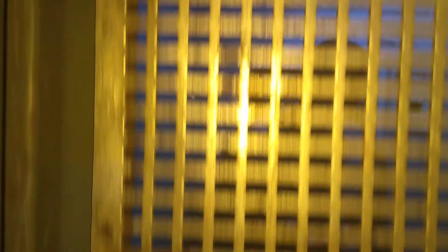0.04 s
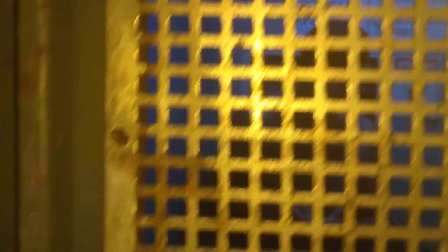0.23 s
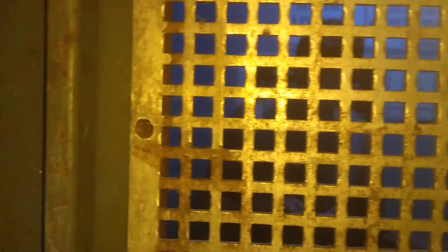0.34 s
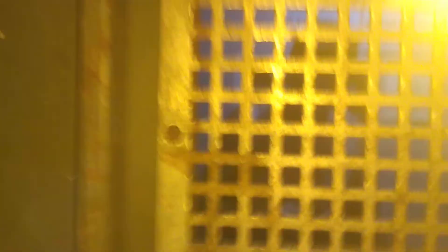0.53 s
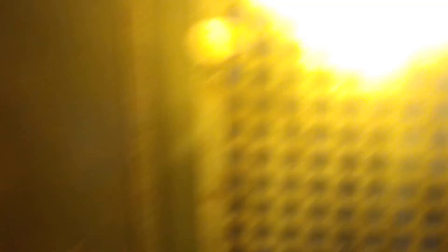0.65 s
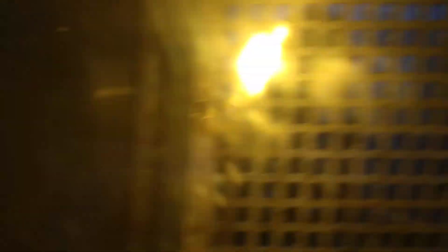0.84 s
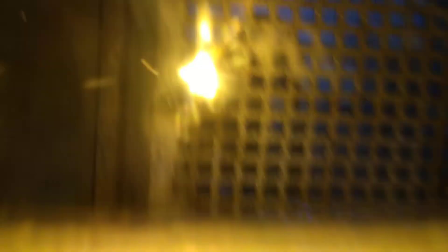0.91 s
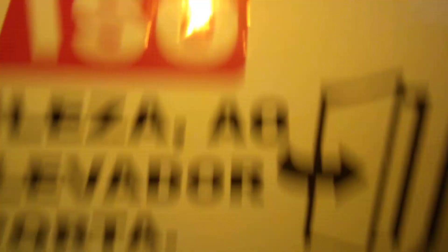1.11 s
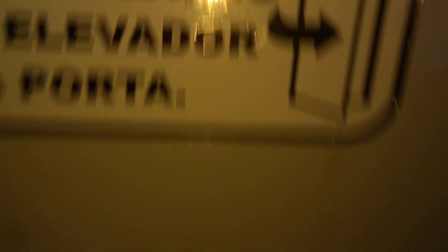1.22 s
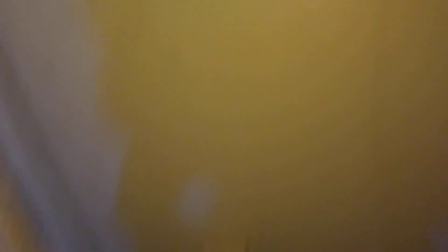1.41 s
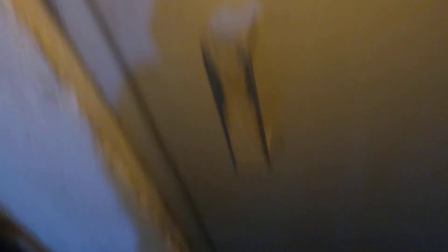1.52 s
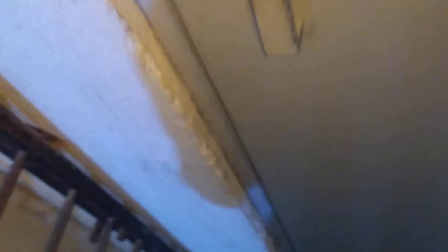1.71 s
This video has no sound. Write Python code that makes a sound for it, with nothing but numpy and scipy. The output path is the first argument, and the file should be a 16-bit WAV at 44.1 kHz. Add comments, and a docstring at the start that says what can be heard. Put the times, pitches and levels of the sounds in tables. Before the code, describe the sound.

Close by inside a lift, a metal door sticks and slips with a groan and a scrape. Two ringing clacks lead to one loud knock, then come a fading hollow hum, a few ticks and soft bumps with rustling.

```python
"""A metal lift door groans, scrapes and clacks twice as it moves, then knocks hard against its stop.
It rolls on with a hollow hum and a few light ticks; soft bumps and rustles follow close by.
The groan is the door sticking and slipping in its guide; the clacks are metal hitting metal.
Two microphone ports (openings) of opposite polarity hear it, and the hardest knock overloads them."""
import sys
import numpy as np
from scipy import signal
from scipy.fft import rfft, irfft
from scipy.io import wavfile
from scipy.ndimage import uniform_filter1d

SR = 44100
rng = np.random.default_rng(int(sys.argv[2]) if len(sys.argv) > 2 else 0)


def store_wav(level_fs):
    """Save 16-bit WAV to argv[1]."""
    pcm = np.round(np.clip(np.atleast_2d(level_fs), -1, 1) * 32767)
    wavfile.write(sys.argv[1], SR, pcm.T.astype(np.int16))


N = 77175
TIME = np.arange(N) / SR
FROM_LEFT, FROM_RIGHT = 1, -1
ATTACK_S = 0.001485  # rise time of clacks and ticks

# How much louder the left is than the right, for three places: f/Hz, level/dB
DOOR_SIDE = [(100, 4.5), (500, -4.5), (1200, 1), (2500, -4), (4500, -7), (8000, -11), (11000, -17.5),
             (15000, -7.5)]
CENTRED = [(100, 4), (500, 1.8), (2000, 0.85), (15000, 0.019)]
CLOSE_SIDE = [(100, 2.5), (500, 3), (2000, 0), (15000, 4.5)]


def amp(db):
    """Turns decibels into a gain."""
    return 10 ** (np.asarray(db) / 20)


def evened(x):
    """Scales a signal to an average power of 1."""
    return x / np.sqrt(np.mean(x ** 2) + 1e-20)


def read(points, hz):
    """Reads between a table's rows along a log-frequency axis."""
    f, value = np.transpose(points)
    return np.interp(np.log(hz + 1), np.log(f + 1), value)


def level(points):
    """Gain over time from a loudness curve."""
    return amp(np.interp(TIME, *np.transpose(points)))


def add(mix, s, sound):
    """Mixes a two-channel sound in at s seconds."""
    part = mix[:, round(s * SR):][:, :sound.shape[1]]
    part += sound[:, :part.shape[1]]


def noise(colour):
    """Two unrelated noises of one colour (the balance of low and high frequencies)."""
    hz = np.fft.rfftfreq(N, 1 / SR)
    return evened(irfft(rfft(rng.standard_normal((2, N))) * amp(read(colour, hz)), N))


def wander(shape, span_s):
    """Random drift: noise smoothed over span_s."""
    return evened(uniform_filter1d(rng.standard_normal(shape), int(span_s * SR)))


def steadied(x, span_s):
    """Evens out a noise's chance swells that are slower than span_s."""
    return x / np.sqrt(abs(uniform_filter1d(x ** 2, int(span_s * SR), axis=-1)) + 1e-12)


def burst(colour, t60, attack_s):
    """A burst of noise that fades by 60 dB in t60 seconds."""
    return noise(colour) * np.minimum(TIME / attack_s, 1) * amp(-60 * TIME / t60)


def swell(peak_s, sharpness):
    """A smooth rise to 1 at peak_s, then a fall."""
    return (TIME / peak_s * np.exp(1 - TIME / peak_s)) ** sharpness


def singing(modes, span_s):
    """Resonances that keep sounding, each a narrow band of noise."""
    hz, out = np.fft.rfftfreq(N, 1 / SR), np.zeros((2, N))
    for f, width, db in modes:
        tone = irfft(rfft(rng.standard_normal((2, N))) / (1 + ((hz - f) / width) ** 4), N)
        out += amp(db) * steadied(tone, span_s)
    return evened(out)


def ports(pair, side, balance, diffuse):
    """The right port hears sound inverted and shifted in time; a diffuse share comes from the far side."""
    delay_s, padded = 0.0004434, N + 4096
    hz = np.fft.rfftfreq(padded, 1 / SR)
    direct, scattered = rfft(pair, padded) * np.sqrt([[1 - diffuse], [diffuse]])
    shift = np.exp(-2j * np.pi * hz * delay_s * side)
    tilt = amp(read(balance, hz))
    left = (direct + scattered) * tilt
    right = -(direct * shift + scattered / shift)
    return irfft(np.array([left, right]) * np.sqrt(2 / (1 + tilt ** 2)), padded)[:, :N]


def corridor():
    """Faint hum of the building, and each microphone's own hiss."""
    # Colours of the hum and the hiss: f/Hz, level/dB
    hum_colour = [(20, -22.5), (60, 1), (130, 7.5), (330, -8), (530, 5.5), (900, -14), (2000, -17.5),
                  (5500, -21.5), (10000, -34), (15000, -34), (16500, -45.5)]
    hiss_colour = [(100, -6.5), (3000, -6.5), (7000, 1), (10000, -5.5), (15000, -11), (16500, -25.5)]
    # Loudness of the hum: t/s, level/dB
    hum_curve = [(0, -61), (1.05, -60.5), (1.17, -67.5), (1.205, -96), (1.24, -67), (1.75, -68)]
    hum = ports(noise(hum_colour) * level(hum_curve), FROM_LEFT, CLOSE_SIDE, diffuse=0.4)
    return hum + amp(-76) * noise(hiss_colour)


def handling():
    """A rustle and the panel's low, ringing shudder around the last bumps."""
    # Colours of the rustle and the panel: f/Hz, level/dB
    rustle_colour = [(30, -4), (90, 8), (200, 21.5), (400, 2), (900, -14), (1500, 0.5), (3000, -1),
                     (5600, -2.5), (8000, -9.5), (12000, -16.5), (16000, -26)]
    panel_colour = [(30, -24), (75, 1), (140, 6), (240, -3.5), (350, -20), (520, -12.5), (800, -32.5),
                    (3000, -44.5)]
    # Loudness of each: t/s, level/dB
    rustle_curve = [(1.2, -98), (1.24, -85), (1.28, -72), (1.355, -65), (1.375, -49.5), (1.405, -46.5),
                    (1.44, -61), (1.52, -64.5), (1.578, -52), (1.594, -42.5), (1.615, -54.5), (1.65, -54.5),
                    (1.68, -66), (1.75, -62)]
    panel_curve = [(1.2, -101.5), (1.26, -72.5), (1.38, -71), (1.42, -56.5), (1.48, -48), (1.52, -63),
                   (1.58, -53.5), (1.61, -43), (1.66, -54.5), (1.75, -55)]
    # Notes of the bumped panel: f/Hz, width/Hz, level/dB
    panel_notes = [(81.9, 8, -1), (140, 10, 6.5), (164, 8.4, 0), (250, 18, -6), (270, 14, -8),
                   (556, 16, -13)]
    shudder = amp(-5) * steadied(noise(panel_colour), span_s=0.05)
    shudder += amp(-0.5) * singing(panel_notes, span_s=0.069)
    rustle = noise(rustle_colour) * level(rustle_curve)
    return ports(rustle + shudder * level(panel_curve), FROM_LEFT, CLOSE_SIDE, diffuse=0.25)


def drone():
    """The door panel drones low just before it reaches the stop."""
    # Notes of the panel: f/Hz, width/Hz, level/dB
    notes = [(140, 10, 0), (212, 16, -2.5), (232, 10, -1.5)]
    # Loudness of the drone: t/s, level/dB
    curve = [(.33, -60.5), (.41, -34.5), (.47, -27), (.53, -31), (.68, -70.5)]
    return ports(singing(notes, span_s=0.059) * level(curve), FROM_RIGHT, CENTRED, diffuse=0.54)


def rolling():
    """The heavy door rumbles as it moves, then runs on with a hollow hum."""
    # Colours of the rumble and the hum: f/Hz, level/dB
    rumble_colour = [(25, -35), (50, -9.5), (100, 0.5), (220, -4.5), (330, -5), (620, -23), (850, -23.5),
                     (1100, -30), (2000, -28.5), (5000, -62)]
    hum_colour = [(40, -36), (110, -6), (230, -4.5), (350, 1), (560, -5), (800, -11), (950, -20),
                  (1150, -10.5), (1350, -23), (2000, -28.5), (4000, -47), (9000, -50.5)]
    # The door's notes in each: f/Hz, width/Hz, level/dB
    rumble_notes = [(101, 14, 0), (134, 30, 1), (184, 4.8, -10), (250.7, 19, 3), (387, 13, -0.5),
                    (483, 6.3, -10), (572, 42, -3.5), (669, 23, -3.5), (787, 25, -6), (900, 23, -24)]
    hum_notes = [(271, 10, -0.5), (338, 13, 1), (391, 11, 0), (502.7, 85, -0.5), (460.4, 13, 1.5),
                 (598, 36, -2.5), (780, 10, -13.5), (1150, 12, -10), (1172, 7.6, -11.5)]
    # Loudness of each: t/s, level/dB
    rumble_curve = [(0, -46.5), (.11, -74), (.17, -46.5), (.228, -43.5), (.248, -30), (.3, -26),
                    (.34, -30.5), (.42, -27.5), (.48, -33.5), (.53, -35), (.59, -25.5), (.655, -36),
                    (.7, -44.5), (.85, -57.5), (1.1, -91.5)]
    hum_curve = [(.54, -63), (.59, -38), (.66, -43), (.72, -40.5), (.8, -42), (.855, -48), (.895, -42.5),
                 (.945, -44), (1, -53), (1.05, -55.5), (1.08, -68), (1.15, -79)]
    rumble = amp(-1) * steadied(noise(rumble_colour), span_s=0.032)
    rumble += amp(-5.5) * singing(rumble_notes, span_s=0.3)
    hum = amp(-1.5) * steadied(noise(hum_colour), span_s=0.013)
    hum += amp(-3) * singing(hum_notes, span_s=1.0)
    return (ports(rumble * level(rumble_curve), FROM_RIGHT, CENTRED, diffuse=0.058)
            + ports(hum * level(hum_curve), FROM_RIGHT, CENTRED, diffuse=0.88))


def scrape():
    """Metal rubs on the track with a fine, grainy hiss."""
    # Colour of the rubbing: f/Hz, level/dB
    colour = [(200, -16.5), (900, -19.5), (1500, 8), (2300, 4), (3400, 1.5), (5300, 5), (7000, -3),
              (9500, -13.5), (13000, -36), (16000, -32.5)]
    # Its loudness: t/s, level/dB
    curve = [(0, -77), (.085, -70.5), (.127, -60.5), (.134, -56), (.161, -54), (.169, -41.5), (.19, -40),
             (.228, -43.5), (.26, -61), (.34, -57), (.55, -55), (.65, -64.5), (.75, -78)]
    grain = amp(2.2 * wander(N, span_s=0.00205))
    return ports(evened(noise(colour) * grain) * level(curve), FROM_RIGHT, DOOR_SIDE, diffuse=0.058)


def groan():
    """The door sticks and slips in its guide: clear, wavering notes over a rough groan."""
    # Notes of the rough groan: f/Hz, width/Hz, level/dB
    notes = [(318, 20, -2.5), (474, 50, -6), (615, 14, -3.5), (653, 21, -11.5), (1284, 30, -21)]
    # Its loudness: t/s, level/dB
    curve = [(0, -60), (.04, -52), (.055, -49), (.12, -54.5), (.14, -49.5), (.19, -42), (.24, -38.5),
             (.3, -43.5), (.45, -45.5), (.52, -49), (.56, -29.5), (.62, -56), (.8, -61.5), (1.08, -87)]
    # Slips, one note each: t/s, level/dB, f/Hz, rise time/s
    slips = [(0, -35.5, 350, 0.0064), (0.037, -34, 350, 0.013), (.042, -35, 584, 0.012),
             (0.041, -67, 1240, .045), (.076, -43.5, 626, 0.013), (.127, -36, 576, 0.012),
             (0.124, -43, 283, 0.18), (.172, -32, 570, 0.011), (.224, -27.5, 586, 0.0081),
             (.232, -38.5, 880, 0.035), (.3, -34.5, 570, 0.048), (0.431, -29, 199, .04),
             (.53, -30, 589.4, 0.04), (0.879, -40.5, 347.7, 0.022), (.885, -44, 476.5, 0.017),
             (0.929, -41.5, 250.5, .022), (.97, -49, 515, 0.037)]
    out = singing(notes, span_s=0.015) * level(curve)
    for s, db, hz, peak_s in slips:
        waver = 0.095 * wander((2, N), span_s=0.012)
        note = amp(db) * swell(peak_s, sharpness=2) * np.sin(2 * np.pi * hz * TIME + waver)
        add(out, s, note * [[1], [0]])  # direct sound only
    return ports(out, FROM_RIGHT, CENTRED, diffuse=0.033)


def ticks():
    """Small latch parts settle, each with a brief, rough ring."""
    # Latch ticks: t/s, level/dB, fade time/s, f/Hz
    hits = [(.691, -44, 0.084, 4300), (0.697, -49.5, 0.124, 4420), (0.7005, -51.5, 0.012, 11700),
            (0.799, -57.5, 0.052, 5920), (0.877, -62, 0.016, 3640), (0.9799, -55, 0.013, 3340)]
    # Colour of a tick: f/Hz, level/dB
    colour = [(300, 3), (1500, 5), (4000, 2.5), (6500, -6), (10000, -11.5), (16000, -28)]
    out, width_hz = np.zeros((2, N)), 400
    for s, db, t60, hz in hits:
        ring = amp(-1 - 60 * TIME / t60) * singing([(hz, width_hz, 0)], span_s=0.011)
        add(out, s, amp(db) * (burst(colour, t60, ATTACK_S) + ring))
    return ports(out, FROM_RIGHT, CENTRED, diffuse=0.058)


def bars():
    """The door's bars ring, fluttering as they rattle."""
    # Notes of the bars: f/Hz, level/dB, fade time/s
    notes = [(2643, -9.5, .14), (3213, 3.5, .2), (3235, 5.5, 0.055), (3350, 6, 0.097), (3490, -7, .22),
             (3700, -6, .15), (4250, -5, .15), (5502, -6, .15), (5780, 8, .06), (6470, -6.5, 0.25),
             (7820, 6, 0.049), (8800, 0, 0.1), (10800, -5.5, .08)]
    flutter_cycles, roughness = 27, 0.5
    out = np.zeros((2, N))
    for hz, db, t60 in notes:
        flutter = wander((2, 2, N), span_s=flutter_cycles / hz)
        wobble = 1 + roughness * (flutter[0] + 1j * flutter[1])  # shakes both level and phase
        tone = np.exp(2j * np.pi * (hz * TIME + rng.random((2, 1))))
        out += amp(db - 60 * TIME / t60) * (wobble * tone).real
    return out / np.sqrt(1 + 2 * roughness ** 2)


def clacks():
    """Metal meets metal: a crack, the ringing bars, and a dense tail from the door and the shaft."""
    # Hits (the first two blend into one clack): t/s, tail/dB, crack/dB, ring/dB, top edge/Hz
    hits = [(0.232, -27.5, -30.5, -49.5, 8370), (0.2392, -36, -27, -50.5, 9950),
            (0.3534, -31, -20, -32.5, 15500)]
    # Colours of the tail and the crack: f/Hz, level/dB
    tail_colour = [(60, -12), (200, 0), (600, 10.5), (870, 0), (1050, -9), (1300, 1.5), (1700, 1.5),
                   (3200, -7), (5500, -7.5), (8000, -16), (12000, -20), (16000, -40.5)]
    crack_colour = [(200, -11.5), (1200, -6.5), (2300, -17), (2950, 9.5), (3300, 1.5), (3700, 5),
                    (4400, 10.5), (5200, -7.5), (5780, 6.5), (6400, 0.5), (7200, 0.5), (7780, -19),
                    (8400, 0), (10400, -12), (11700, -9), (14000, -24.5), (16000, -54.5)]
    # How long the tail lasts: f/Hz, fade time/s
    tail_fade = [(150, 1), (600, 0.77), (1500, 0.28), (3500, 0.57), (7000, 0.48), (14000, 0.68)]
    out = np.zeros((2, N))
    for s, tail_db, crack_db, ring_db, top_hz in hits:
        hz, t, bands = signal.stft(noise(tail_colour), SR, nperseg=256)
        fade = amp(-60 * t / read(tail_fade, hz)[:, None])
        tail = signal.istft(bands * fade, SR, nperseg=256)[1][:, :N]
        body = (amp(tail_db) * tail + amp(ring_db) * bars()) * np.minimum(TIME / ATTACK_S, 1)
        crack = amp(crack_db) * burst(crack_colour, t60=0.065, attack_s=ATTACK_S)
        add(out, s, signal.sosfilt(signal.butter(2, top_hz, fs=SR, output="sos"), body + crack))
    return ports(out, FROM_RIGHT, DOOR_SIDE, diffuse=0.15)


def knocks():
    """Close, dead blows: one push, a snap and a short after-ring, plus the panel's dull swing."""
    # Blows: t/s, push/dB, low edge/Hz, high edge/Hz, snap/dB, after-ring/dB
    blows = [(.556, -21.5, 504, 3170, -37, -29.5), (0.5726, 1, 240, 600, -7, -31.5),
             (0.5802, -14.5, 249.8, 3470, -14.5, -54), (0.5813, -11.5, 903, 4440, -19.5, -49),
             (0.5888, -18, 151.2, 1265, -55, -33), (0.5947, -13, 300, 1300, -52, -45),
             (.644, -30.5, 160, 1600, -61, -35.5), (0.652, -26, 201, 1810, -52, -60),
             (1.2246, -33, 122, 481.5, -39, -56), (1.395, -54.5, 143, 394, -63, -52.5),
             (1.5829, -22, 133.3, 1140, -26.5, -43.5)]
    # Colours of the snap and the after-ring: f/Hz, level/dB
    snap_colour = [(300, -6), (1100, -9.5), (2200, 12.5), (3300, -3.5), (4400, 7), (5800, 0.5), (8000, -2),
                   (10000, -5), (13000, -9.5), (16000, -19)]
    ring_colour = [(60, -22.5), (150, 0.5), (330, -5), (520, 8), (800, -8), (1600, -12), (3500, -21.5),
                   (8000, -41), (16000, -66)]
    # Thumps of the panel: t/s, level/dB, f/Hz, rise time/s
    thumps = [(0.5884, -5, 119.4, 0.0078), (0.638, -35, 95.5, 0.0075), (1.3913, -20, 95.7, 0.0057),
              (1.405, -33.5, 75.8, 0.011), (1.583, -12, 171, 0.005)]
    out, kick = np.zeros((2, N)), signal.unit_impulse(4096)
    for s, db, low_hz, high_hz, snap_db, ring_db in blows:
        push = signal.sosfilt(signal.butter(2, high_hz, fs=SR, output="sos"), kick)
        push = signal.sosfilt(signal.butter(3, low_hz, "high", fs=SR, output="sos"), push)
        add(out, s, amp(db) * np.array([push, push]) / abs(push).max())
        add(out, s, amp(snap_db) * burst(snap_colour, t60=0.0066, attack_s=0.0001))
        add(out, s, amp(ring_db) * burst(ring_colour, t60=0.18, attack_s=0.002))
    for s, db, hz, peak_s in thumps:
        thump = amp(db) * swell(peak_s, sharpness=5) * np.sin(2 * np.pi * hz * TIME)
        add(out, s, np.array([thump, thump]))
    return ports(out, FROM_LEFT, CLOSE_SIDE, diffuse=0)


def scene():
    """All the sounds together at the two ports."""
    door = clacks() + ticks() + knocks() + groan() + scrape() + rolling() + drone()
    return door + handling() + corridor()


def record(dry):
    """The microphones lose the deepest bass, clip the loudest peak and cut the highest treble."""
    low_cut_hz, overload, top_hz = 51, 0.96, 16200
    hz = np.fft.rfftfreq(2 * N, 1 / SR)
    bass_cut = hz ** 3 / np.hypot(hz ** 3, low_cut_hz ** 3)
    thin = irfft(rfft(dry, 2 * N) * bass_cut)[:, :N]
    clipped = np.clip(thin, -overload, overload)
    treble_cut = signal.firwin(255, top_hz, window=("kaiser", 9), fs=SR)
    return signal.oaconvolve(clipped, treble_cut[None], "same")


dry = scene()
out = record(dry)
store_wav(out)
```